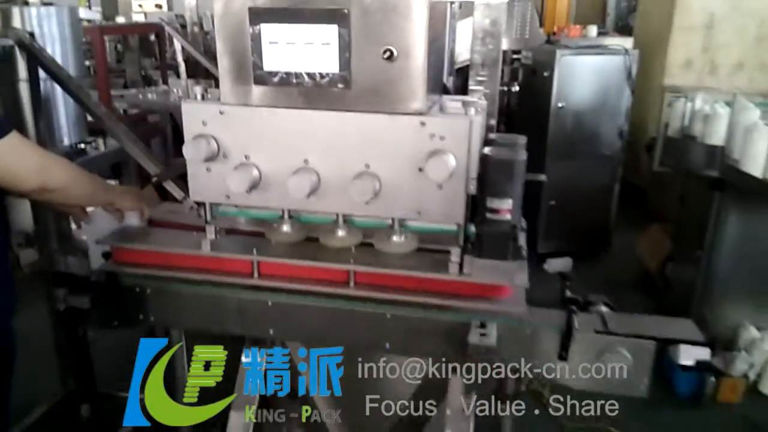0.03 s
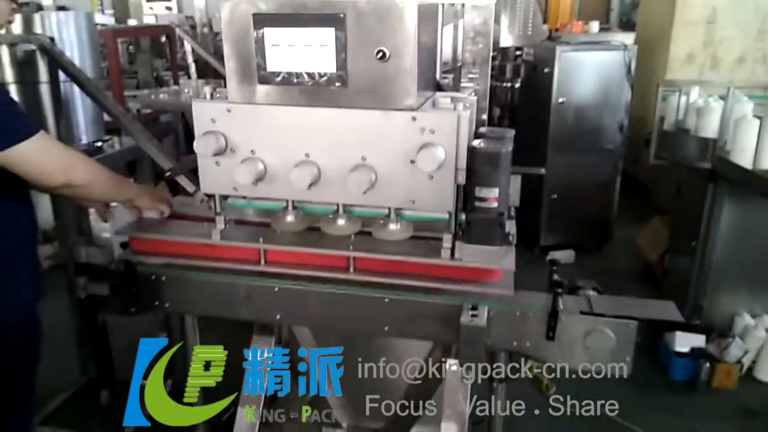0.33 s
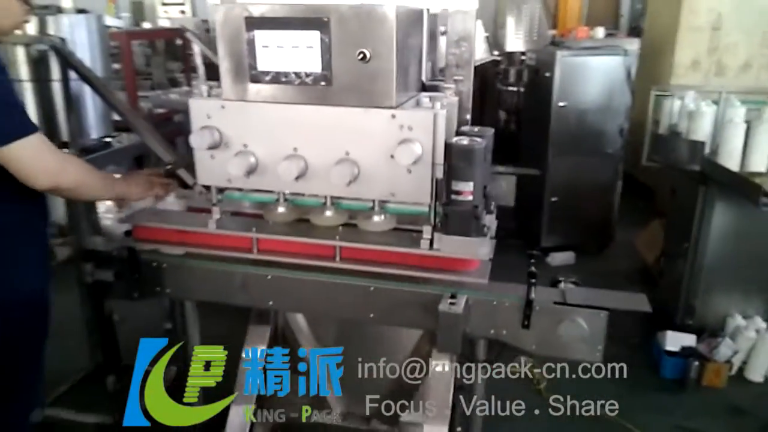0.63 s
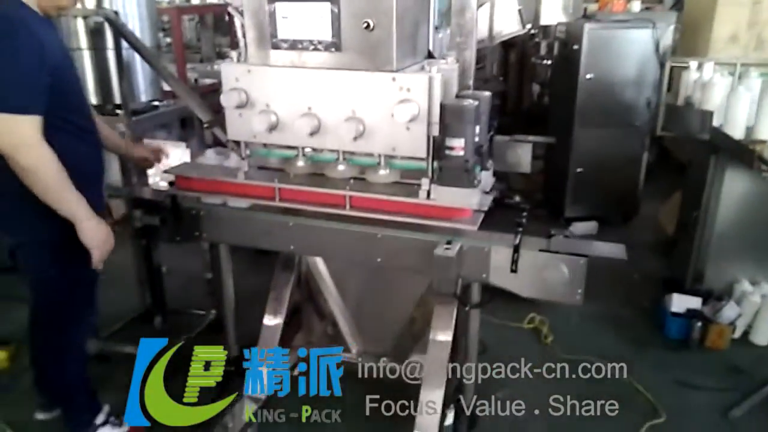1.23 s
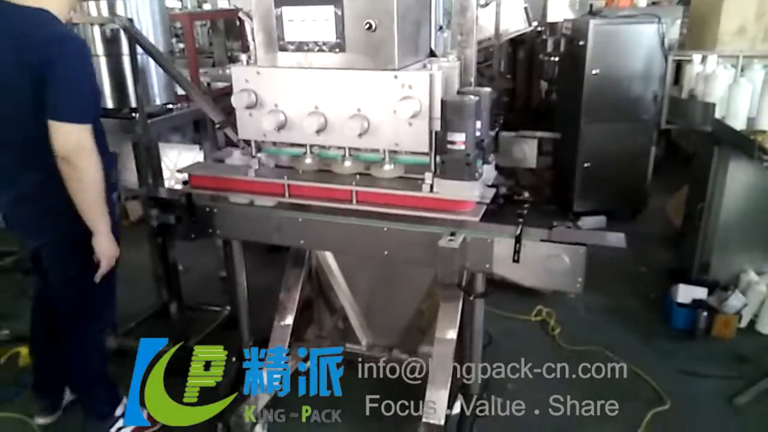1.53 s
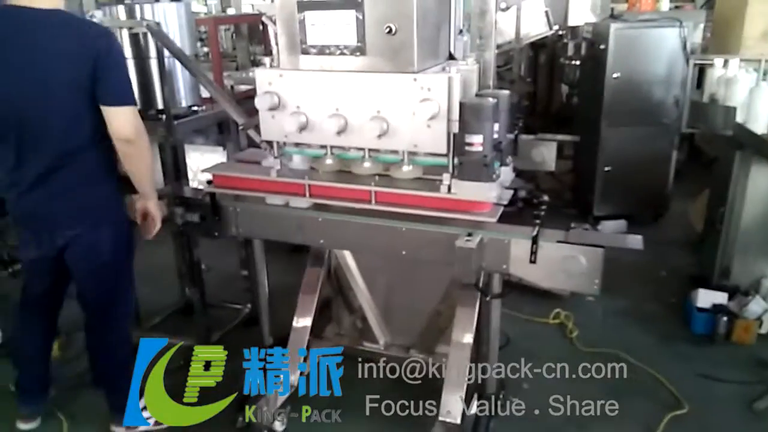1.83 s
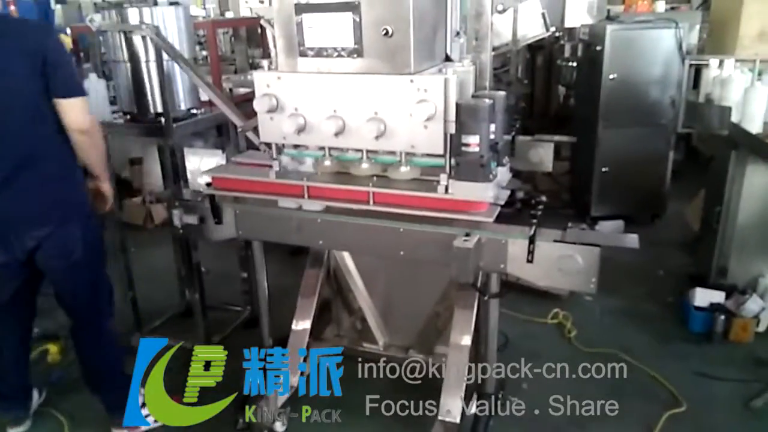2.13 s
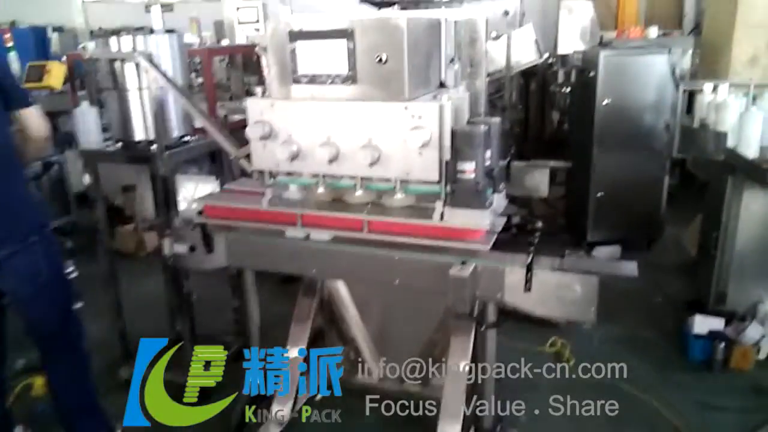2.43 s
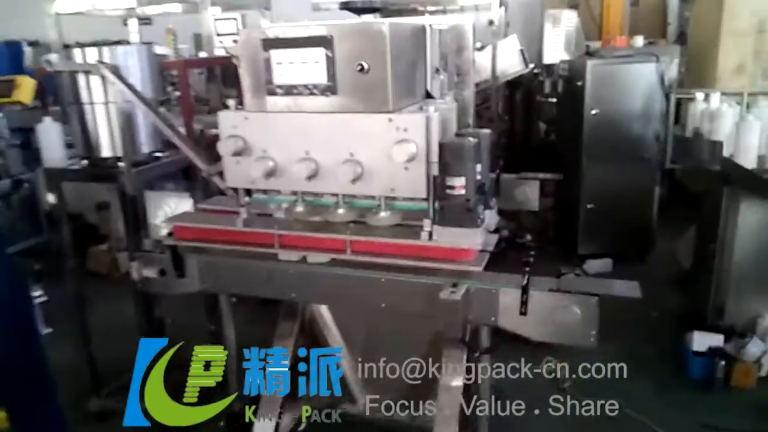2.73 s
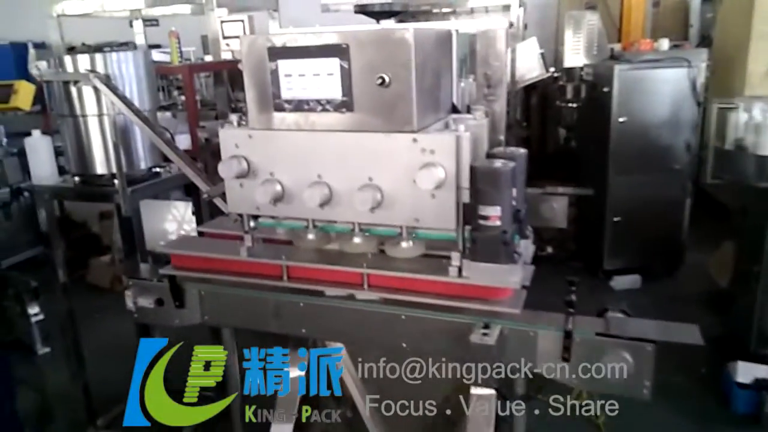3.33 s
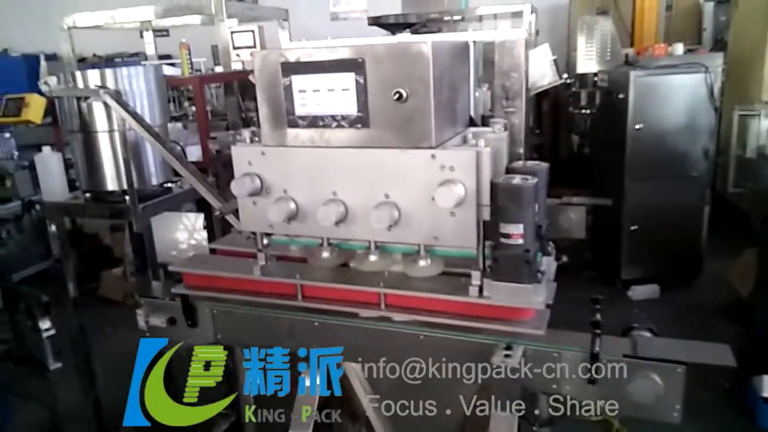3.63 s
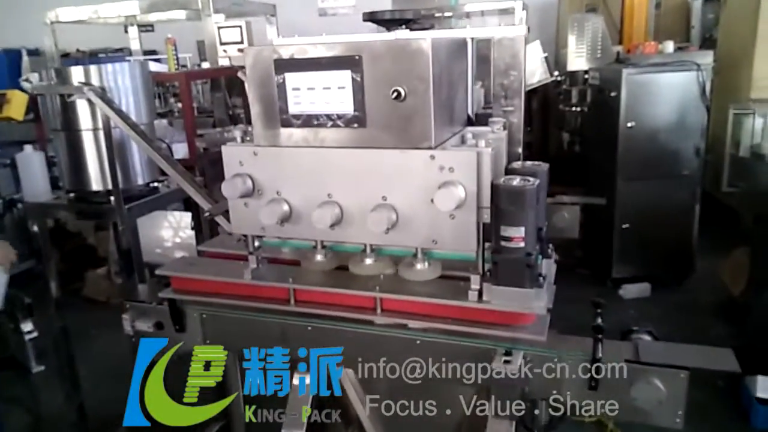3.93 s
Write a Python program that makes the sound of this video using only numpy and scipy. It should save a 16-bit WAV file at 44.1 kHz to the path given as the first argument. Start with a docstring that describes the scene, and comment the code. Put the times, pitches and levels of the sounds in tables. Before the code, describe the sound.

A bottle-capping machine runs steadily in a hard-walled workshop, its motors roaring under gear whine, hiss and a thin high whistle. Metal clacks twice midway, and a brief low sliding rumble comes near the end, heard on a moving hand-held microphone.

```python
"""A hard-walled workshop, with a bottle-capping machine running. Motors and belts roar, gears whine,
air hisses, and a fast shaft rasps while its bearing whistles. Metal parts clack twice and tick a few
times, setting the steel ringing; near the end something heavy slides with a low rumble.
The microphone is mono and hand-held: tones swell and reflections shift as it moves,
and its gain control ducks after each clack."""
import sys
import numpy as np
from scipy import signal
from scipy.fft import rfft, irfft
from scipy.io import wavfile
from scipy.ndimage import map_coordinates

SR = 44100
rng = np.random.default_rng(int(sys.argv[2]) if len(sys.argv) > 2 else 0)


def put_to_file(sound):
    """Save the sound as 16-bit audio at rate SR, in the file named by the first command-line argument."""
    columns = np.atleast_2d(sound).T  # one column per channel
    safe = np.clip(columns, -1, 1)
    whole_steps = np.round(safe * 32767)
    wavfile.write(sys.argv[1], SR, whole_steps.astype(np.int16))


N = 176400
T = np.arange(N) / SR

# Colour of the motor and belt roar. Each row: frequency in Hz, relative level in dB.
ROAR_COLOUR = [(30,-75),(75,-43),(130,-25.5),(175,-18),(215,-2.5),(300,-2.5),(420,-0.5),(560,0.4),(800,3),(1080,4),(1330,2.5),(1650,2),(2100,0.5),(2380,-2),(2700,0),(3200,-5.5),(4500,-17.5)]
# Fader ride of the roar. Each row: time in seconds, level in dB.
ROAR_FADER = [(0,-28.5),(.15,-29),(.5,-31),(1.2,-30.5),(1.55,-30),(2.0,-30),(2.3,-31),(2.65,-28),(3.05,-30.5),(3.33,-30),(3.55,-28.5),(3.75,-30.5),(4,-28.5)]
# Motor and gear tones. Each row: pitch in Hz, width in Hz, roughness from 0 to 1, resting level in dB,
# swell centre in seconds, swell spread in seconds, swell boost in dB.
GEAR_TONES = [(320.3,21,0.82,-44,1.0,0.16,2),(857,10.8,0.04,-60.5,0.66,0.17,19),(904,9.4,.3,-52.5,3,0.13,13),(1052,19,0.58,-52.5,1.67,0.35,10.5),(1077,32,.9,-51.5,1.9,0.4,7.5),(1115,20,0.8,-71,2.34,0.12,16),
              (1461,10.7,0.1,-46,2.98,0.22,6.5),(1486,4.9,0,-67.5,3.9,0.099,31.5),(1608,17,0.3,-59.5,3.16,0.65,15.5),(1891,14.1,0.6,-47,3.93,.15,7.5),(2270,37,0.85,-54,4.12,0.59,9),(2760,14.4,0.3,-53,2.72,0.19,11),
              (3469,28.4,.5,-49.5,2.31,0.42,11),(3766,19,.3,-53.5,2.6,0.068,18),(3986,63,.6,-57.5,0.85,0.65,13.5),(4740,84,0.7,-50.5,0.3,0.44,10),(4990,18,.3,-50.5,3.29,0.061,14.5),(8000,190,1,-49,3.0,0.14,10.5),(8400,86,1,-51,3.5,0.27,5)]
# A belt sings briefly and sags. Each row: time in seconds, pitch in Hz, level in dB.
BELT_PATH = [(1.75,2110,-60),(2.05,2110,-43),(2.3,2115,-50),(2.5,2113,-37.5),(2.78,2070,-38.5),(3.02,2035,-37),(3.25,2060,-56)]
# Metal hits. Each row: start in seconds, crack level in dB, crack decay in seconds,
# relative ring level in dB, crack low cut in Hz, centre of the ring in Hz.
METAL_HITS = [(.0595,-36,.002,-26,3950,5000),(.077,-36,0.0082,-31,3500,6500),(.1795,-39,.0012,-37,800,4500),(.300,-39,.002,-40,3500,5000),
              (1.6912,-24,0.0046,-36,600,8000),(1.6953,-15.5,0.0042,-18,2800,5250),(1.7115,-24,0.0051,-19,2510,4300),(1.7575,-33,.002,-30,3500,5000),
              (2.1995,-23,0.003,-31,3300,5000),(2.2033,-15.5,0.0013,-14,3300,3600),(2.2092,-20,.0025,-23,3380,4200),(2.2185,-23.5,.013,-23,3300,5000)]
# Colour of a hit's crack. Each row: frequency in Hz, relative level in dB.
CRACK_COLOUR = [(300,-10),(2400,-8),(3600,0),(5300,1),(6500,-5),(8000,-1),(9700,-13),(10500,-4),(12000,-6),(15800,-8)]
# Ring of struck steel. Each row: pitch in Hz, relative level in dB, seconds to fade by 60 dB.
STEEL_MODES = [(3495,-3,0.14),(3590,1,.07),(3800,-0.5,0.039),(5010,2,0.12),(5240,1,0.049),(5500,1,.07),(5840,-13,.08),(7450,-7,0.04),(7500,-5,.07),(8300,-3,0.06)]
# Colour of the air and belt hiss. Each row: frequency in Hz, relative level in dB.
HISS_COLOUR = [(1500,-44),(3150,-4.5),(3450,-0.5),(4050,3.5),(4450,0),(5050,4.5),(5600,1.85),(6500,-1.5),(7300,-1),(7750,-2.5),(8450,-2.5),(9000,-6),(9700,-14.5),(10400,-16),(11300,-24),(14800,-14),(15800,-8.5)]
# Fader ride of the hiss. Each row: time in seconds, level in dB.
HISS_FADER = [(0,-29),(.1,-28),(.6,-28),(.9,-28.5),(1.12,-28.5),(1.6,-28),(1.9,-26),(2.15,-28),(2.4,-25.5),(2.75,-28.5),(3.1,-28),(3.47,-29.5),(3.8,-27.5),(4,-27.5)]
# Colour of the shaft's rasp. Each row: frequency in Hz, relative level in dB.
RASP_COLOUR = [(8000,-20),(10300,-12),(10900,-2),(11350,3),(11900,1),(13500,0),(14900,-.5),(15700,-4)]
# Fader ride of the rasp. Each row: time in seconds, level in dB.
RASP_FADER = [(0,-56),(.2,-47),(.47,-32),(.75,-35.5),(1.03,-34.5),(1.2,-31.5),(1.43,-34),(1.62,-38),(2.1,-36),(2.3,-41),(2.48,-34),(2.75,-36.5),(3.05,-32.5),(3.25,-39),(3.52,-42),(3.8,-37),(4,-36)]
# The bearing's close whistles. Each row: pitch offset in Hz, relative level in dB.
WHISTLE_CLUSTER = [(-230,-3),(-110,-11),(0,1.5),(140,-3.5)]
# Glide of that cluster. Each row: time in seconds, pitch in Hz, level in dB.
WHISTLE_GLIDE = [(0,11480,-59),(.25,11400,-44),(.5,11420,-35.5),(.72,11250,-47),(1.05,11320,-34.5),(1.35,11480,-54),(1.55,11500,-41),(1.95,11470,-54),(2.2,11400,-37.5),(2.42,11380,-39),(2.62,11360,-61),(2.74,11400,-33.5),(2.95,11480,-45),(3.22,11300,-35.5),(3.42,11400,-39.5),(3.54,11560,-46),(3.69,11660,-34),(4,11540,-49)]
# The heavy slide. Each row: time in seconds, resonance in Hz, level in dB.
SLIDE_PATH = [(3.38,235,-60),(3.425,244,-35.5),(3.48,270.7,-35),(3.55,305.6,-33.5),(3.72,304.4,-35.5),(3.82,281,-39),(3.92,266,-53)]
# Colour of the slide's grit. Each row: frequency in Hz, relative level in dB.
GRIT_COLOUR = [(80,-55),(180,-32),(350,2),(1000,-1),(1700,-8),(3000,-36)]
# Rubs of moving parts. Each row: centre in seconds, pitch in Hz, width in Hz, spread in seconds,
# level in dB.
RUBS = [(0.046,552,178,0.17,-36.5),(0.082,6500,1500,0.0074,-29),(0.336,4780,700,0.008,-28),(1.24,4040,90,0.073,-38),(1.58,445,70,.02,-36.5),(2.023,5900,700,0.009,-32),(2.078,450,89,0.0097,-31.5),(3.895,1652,600,0.032,-34)]
# Colour of the drive's drone. Each row: frequency in Hz, relative level in dB.
DRONE_COLOUR = [(40,-70),(100,-52),(170,-14),(225,-2.5),(290,-3.5),(370,-5.5),(500,-13.5),(900,-58)]
# Fader ride of the drone. Each row: time in seconds, level in dB.
DRONE_FADER = [(0,-48.5),(.7,-44),(.95,-40.5),(1.2,-41),(1.4,-44.5),(2.0,-47.5),(2.35,-46),(2.62,-47.5),(2.88,-39.5),(3.0,-53),(3.3,-51),(4,-46.5)]
# Reflections off nearby steel panels. Each entry: delay in seconds.
PANEL_ECHOES_S = [.0018,.0036,.0047,.0083,.0131,.0179,.0233]

FLUTTER_HZ = 11  # how fast the levels flicker
ROAR_FLUTTER_DB, TONE_FLUTTER_DB, HISS_FLUTTER_DB, RASP_FLUTTER_DB = .5, 3.5, .84, .5


def motors():
    """Motors roar, a belt sings, and each gear tone swells once as the microphone moves."""
    level_db, = automation(ROAR_FADER)
    out = noise(ROAR_COLOUR) * from_db(level_db + ROAR_FLUTTER_DB * drift(FLUTTER_HZ))
    for hz, width_hz, roughness, db, centre_s, spread_s, boost_db in GEAR_TONES:
        out += gear_tone(hz, width_hz, roughness) * from_db(db + boost_db * swell(centre_s, spread_s))
    belt_hz, belt_db = automation(BELT_PATH)
    belt = gear_tone(belt_hz, width_hz=66, roughness=.6) * from_db(belt_db)
    return low_cut(out + belt, hz=88)


def gear_tone(hz, width_hz, roughness):
    """A whine, slightly unsteady in pitch and level, blended with a rough tone that breaks up."""
    phase = 2 * np.pi * np.cumsum(hz + .5 * width_hz * drift(width_hz)) / SR
    whine = rms_one(np.sin(phase) * from_db(TONE_FLUTTER_DB * drift(FLUTTER_HZ)))
    return np.sqrt(1 - roughness) * whine + np.sqrt(roughness) * waver(hz, width_hz)


def clacks(room_db=-7, room_decay_s=.033, ring_octaves=.5):
    """Metal hits metal: a short crack with a room tail, and the steel rings on."""
    out, t = np.zeros(N + SR), T[:SR // 2]
    crack_noise = noise(CRACK_COLOUR)
    room_tail = from_db(room_db) * np.exp(-t / room_decay_s)
    for start_s, db, decay_s, ring_db, low_cut_hz, centre_hz in METAL_HITS:
        ring = np.zeros(len(t))
        for hz, mode_db, t60 in STEEL_MODES:
            mode = from_db(ring_db + mode_db - 60 * t / t60) * np.sin(2 * np.pi * (hz * t + rng.random()))
            ring += mode / (1 + (np.log2(hz / centre_hz) / ring_octaves) ** 2)
        envelope = np.hypot(np.exp(-t / decay_s), room_tail)
        burst = np.roll(crack_noise, rng.integers(N))[:len(t)] * envelope
        start = int(start_s * SR)
        out[start:start + len(t)] += from_db(db) * low_cut(burst, low_cut_hz) + .5 * ring
    return out[:N]


def hiss(buzz_hz=100, buzz_depth=.035):
    """Air and belts hiss, with a faint mains buzz from the motors."""
    level_db, = automation(HISS_FADER)
    buzz = 1 + buzz_depth * np.sin(2 * np.pi * buzz_hz * T)
    return noise(HISS_COLOUR) * from_db(level_db + HISS_FLUTTER_DB * drift(FLUTTER_HZ)) * buzz


def shaft_rasp(turns_per_s=158.5, wander=.004, likeness=.8, throb_depth=.093):
    """A fast shaft rubs and throbs, each turn partly repeating the friction of the last."""
    level_db, = automation(RASP_FADER)
    speed_hz = turns_per_s * (1 + wander * drift(.97))
    friction = noise(RASP_COLOUR)
    rasp = np.zeros(N)
    for turn in range(5):
        earlier = np.arange(N) - turn * SR / speed_hz
        rasp += likeness ** turn * map_coordinates(friction, [earlier], mode="wrap")
    throb = 1 + throb_depth * np.sin(2 * np.pi * np.cumsum(speed_hz) / SR)
    return rms_one(rasp * throb) * from_db(level_db + RASP_FLUTTER_DB * drift(FLUTTER_HZ))


def bearing_whistle(width_hz=57):
    """The shaft's bearing whistles in a cluster of close pitches that glide together."""
    hz, level_db = automation(WHISTLE_GLIDE)
    cluster = sum(from_db(db) * waver(hz + offset_hz, width_hz) for offset_hz, db in WHISTLE_CLUSTER)
    return rms_one(cluster) * from_db(level_db)


def slide(grit_db=-2):
    """Something heavy slides: a low resonance that rises with its speed, and some grit."""
    resonance_hz, level_db = automation(SLIDE_PATH)
    body = low_cut(waver(resonance_hz, width_hz=130), hz=191)
    return from_db(level_db) * (body + from_db(grit_db) * noise(GRIT_COLOUR))


def scuffs():
    """Moving parts rub briefly, each swelling and fading in one resonance."""
    return sum(waver(hz, width_hz) * from_db(db) * swell(centre_s, spread_s)
               for centre_s, hz, width_hz, spread_s, db in RUBS)


def rattle(ticks_per_s=25, softest_db=-43, spread_db=3, decay_s=.002):
    """The running conveyor gives off small random ticks."""
    triggers = rng.random(N) < ticks_per_s / SR
    tick_db = softest_db + spread_db * np.minimum(rng.exponential(1, N), 4)
    envelope = lag(triggers * from_db(tick_db), decay_s) * decay_s * SR
    return noise(CRACK_COLOUR) * envelope


def drone():
    """The drive lays a bed of low noise under the machine."""
    level_db, = automation(DRONE_FADER)
    return noise(DRONE_COLOUR) * from_db(level_db)


def panels(x, echo_db=-16, drift_hz=.56):
    """Reflections off steel panels come and go as the microphone moves: new colour, same power."""
    gains = [from_db(echo_db) * drift(drift_hz) for _ in PANEL_ECHOES_S]
    echoes = sum(gain * np.roll(x, int(delay_s * SR)) for gain, delay_s in zip(gains, PANEL_ECHOES_S))
    return (x + echoes) / np.sqrt(1 + np.sum(np.square(gains), axis=0))


def noise(spectrum):
    """Noise of a given colour, rms 1."""
    hz, db = np.transpose(spectrum)
    colour_db = np.interp(np.log(np.fft.rfftfreq(N, 1 / SR) + 1), np.log(hz), db)
    return rms_one(irfft(rfft(rng.standard_normal(N)) * from_db(colour_db), N))


def waver(hz, width_hz):
    """A tone that wavers in strength and phase, rms about 1."""
    phase = 2 * np.pi * np.cumsum(hz + np.zeros(N)) / SR
    return drift(width_hz / 2) * np.cos(phase) + drift(width_hz / 2) * np.sin(phase)


def drift(rate_hz):
    """Smooth random modulation, mostly slower than rate_hz, rms 1."""
    hz = np.fft.rfftfreq(N, 1 / SR)
    return rms_one(irfft(rfft(rng.standard_normal(N)) / (1 + (hz / rate_hz) ** 2), N))


def swell(centre_s, spread_s):
    """A bell-shaped fade in and out, peaking at 1."""
    return np.exp(-.5 * ((T - centre_s) / spread_s) ** 2)


def automation(rows):
    """Join timed breakpoints with straight ramps, one curve for each column after the time."""
    times, *columns = np.transpose(rows)
    return [np.interp(T, times, column) for column in columns]


def low_cut(x, hz, order=6):
    """Roll off the lows below hz."""
    return signal.sosfilt(signal.butter(order, hz, "high", fs=SR, output="sos"), x)


def lag(x, seconds):
    """One-pole smoothing."""
    pole = np.exp(-1 / (seconds * SR))
    return signal.lfilter([1 - pole], [1, -pole], x + 1e-18)


def from_db(db):
    """Decibels to gain."""
    return 10 ** (np.asarray(db) / 20)


def rms_one(x):
    """Scale to rms 1."""
    return x / np.sqrt(np.mean(np.abs(x) ** 2) + 1e-20)


def scene():
    """The mono mix on two channels: small parts give off no bass, and panels throw back the treble."""
    small_parts = low_cut(clacks() + rattle() + scuffs(), hz=250, order=2)
    machine = motors() + drone()
    treble = panels(hiss() + shaft_rasp() + bearing_whistle())
    return np.tile(machine + treble + small_parts + slide(), (2, 1))


def record(dry):
    """The gain ducks after loud hits and recovers; peaks are rounded and the very top is cut."""
    threshold_db, duck_share = -22.5, .68
    sense_s, attack_s, release_db_per_s = .008, .008, 38
    ceiling, high_cut_hz = .55, 15720
    level_db = 10 * np.log10(lag(dry[0] ** 2, sense_s) + 1e-12)
    over_db = np.maximum(level_db - threshold_db, 0)
    release_db = release_db_per_s * T
    held_db = np.maximum.accumulate(over_db + release_db) - release_db  # each peak falls back steadily
    ducked = dry * from_db(-duck_share * lag(held_db, attack_s))
    rounded = ducked / (1 + (ducked / ceiling) ** 4) ** .25
    return signal.sosfilt(signal.ellip(14, .1, 85, high_cut_hz, fs=SR, output="sos"), rounded)


dry = scene()
out = record(dry)
put_to_file(out)
```